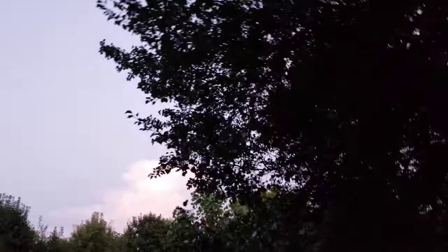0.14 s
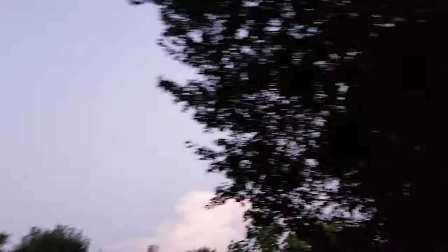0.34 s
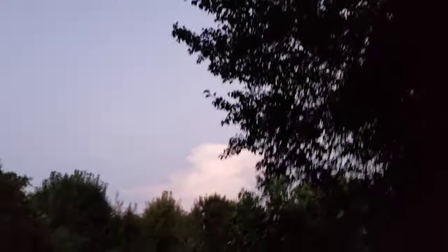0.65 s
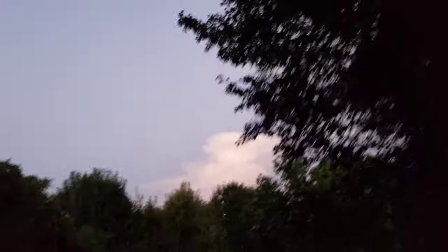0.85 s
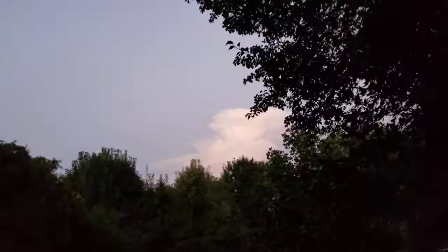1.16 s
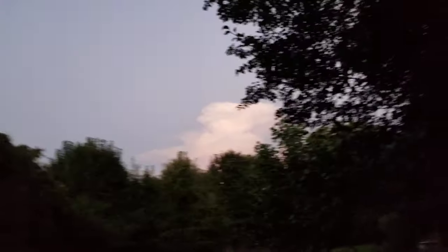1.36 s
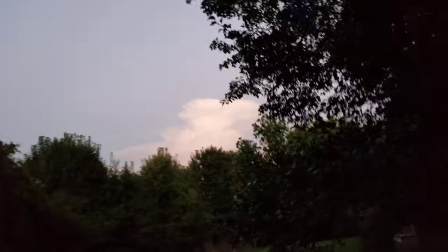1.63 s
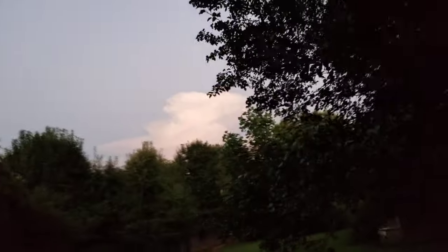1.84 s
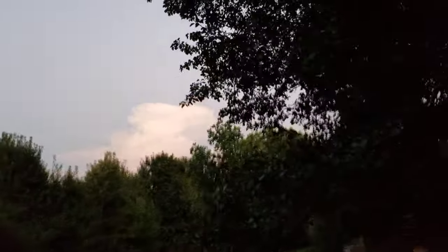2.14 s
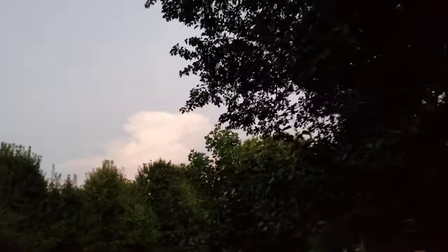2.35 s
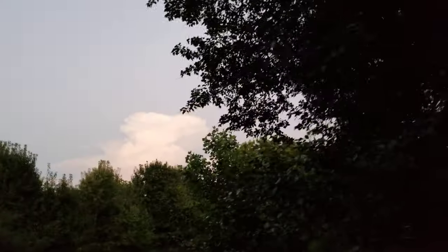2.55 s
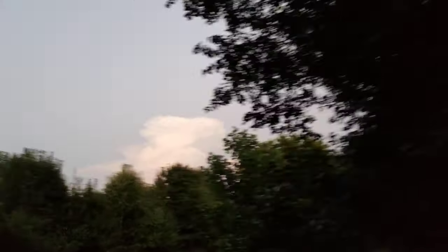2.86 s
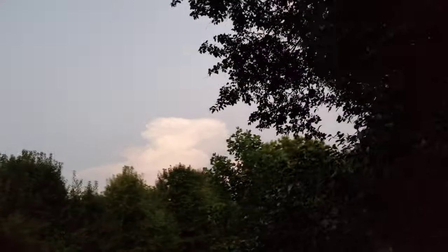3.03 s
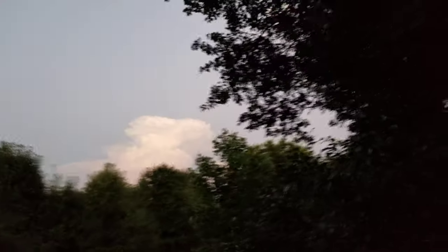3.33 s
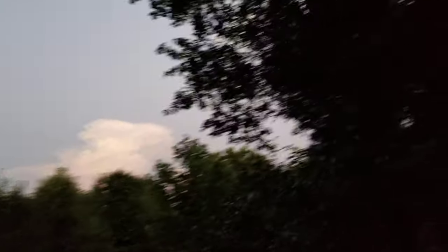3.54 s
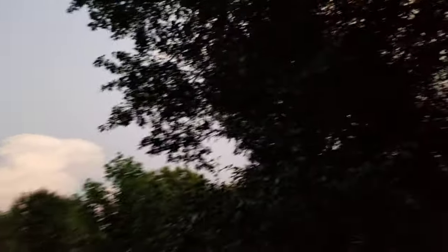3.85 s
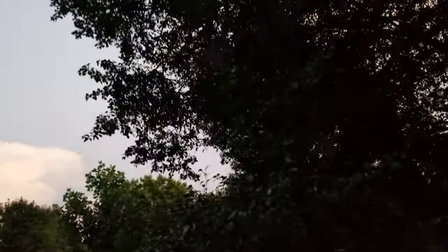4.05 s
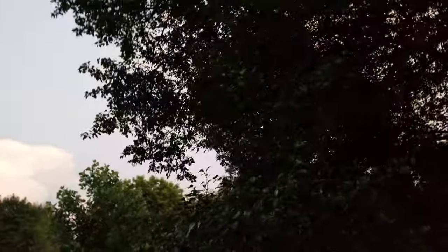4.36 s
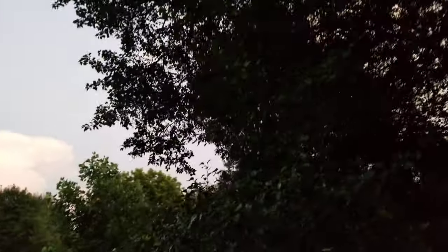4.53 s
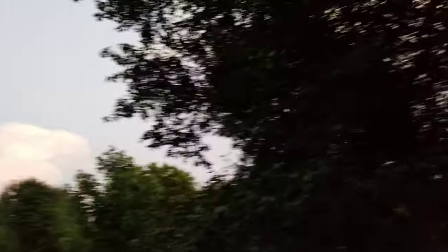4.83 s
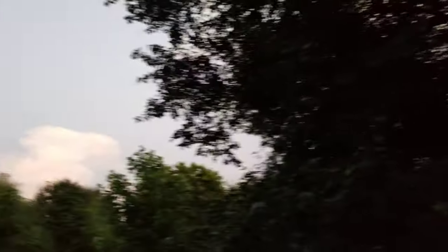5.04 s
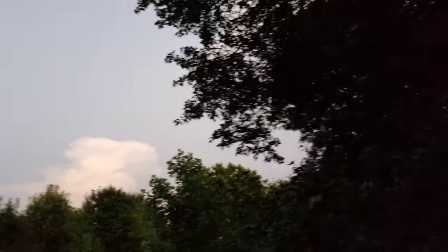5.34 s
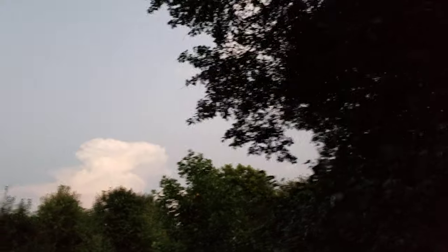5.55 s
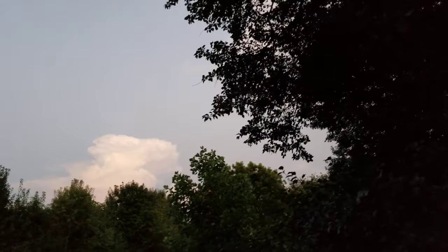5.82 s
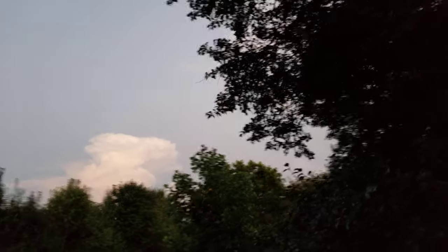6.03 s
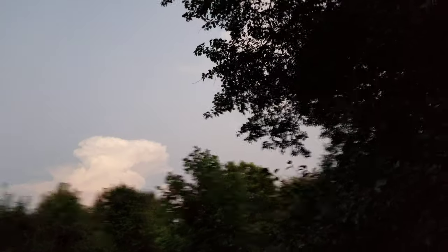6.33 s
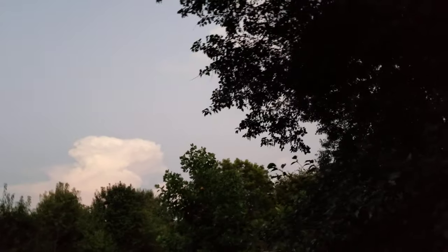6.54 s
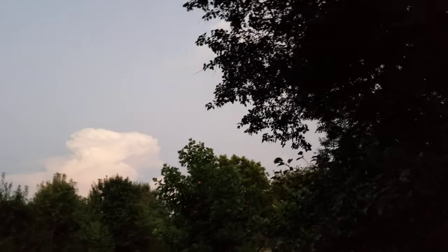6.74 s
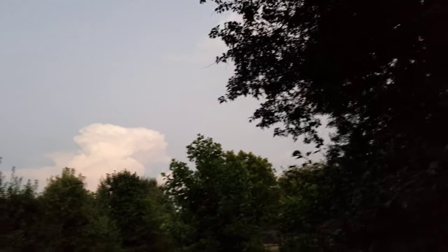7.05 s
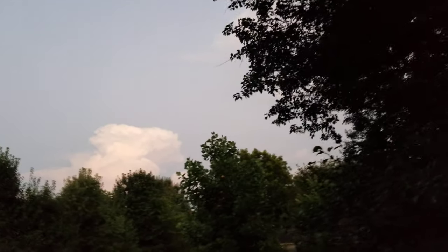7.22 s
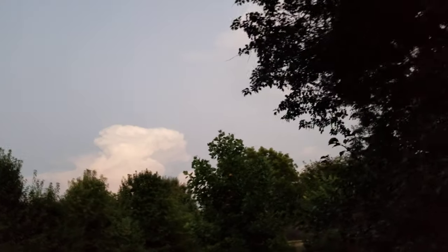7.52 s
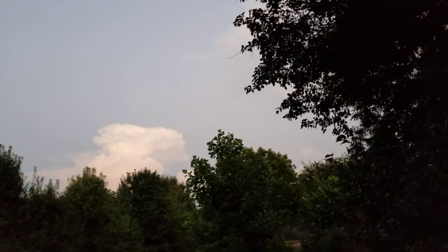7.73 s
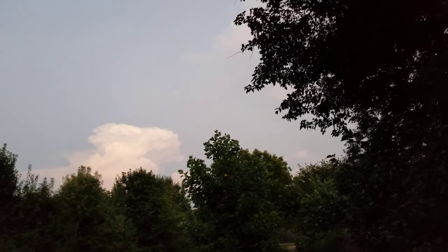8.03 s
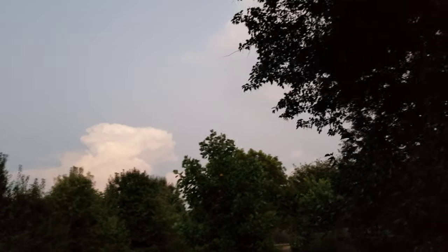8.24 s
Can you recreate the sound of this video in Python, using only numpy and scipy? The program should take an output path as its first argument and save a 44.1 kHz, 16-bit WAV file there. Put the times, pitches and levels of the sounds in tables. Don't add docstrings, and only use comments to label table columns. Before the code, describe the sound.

Under trees at dusk, a small handheld stereo microphone hears a single nearby cicada rattling dry rapid clicks with a hollow ring. Its buzz slows slightly, then accelerates and swells strongly, still notched by brief gaps three or so times a second. Far insects pulse on a high shrill band, gradually losing their step. Beneath lie a humming air conditioner, whose pump swells in early, and soft distant traffic.

```python
import sys
import numpy as np
from scipy import signal
from scipy.fft import rfft, irfft
from scipy.io import wavfile
from scipy.ndimage import uniform_filter1d, map_coordinates

SR = 44100
rng = np.random.default_rng(int(sys.argv[2]) if len(sys.argv) > 2 else 0)


def level_to_linear(level):
    exponent = np.asarray(level, float) / 20
    return 10 ** exponent


def int16_out(signal):
    q = np.round(np.clip(np.atleast_2d(signal).T, -1, 1) * 32767)
    wavfile.write(sys.argv[1], SR, q.astype(np.int16))


N = 369558
T = np.arange(N) / SR
HZ = np.fft.rfftfreq(N, 1 / SR)


def evened(x):
    return x / np.sqrt(np.mean(x ** 2) + 1e-20)


def columns(rows):
    s, *values = np.transpose(rows)
    return [np.interp(T, s, v) for v in values]


def read(points, hz):
    f, value = np.transpose(points)
    return np.interp(np.log(hz + 1), np.log(f + 1), value)


def coloured(x, gain):
    y = irfft(rfft(x) * gain, N)
    middle = np.atleast_2d(y).mean(0)
    return y / np.sqrt(np.mean(middle ** 2))


def above(edge_hz, soft_hz):
    return 1 / (1 + np.exp(np.clip((edge_hz - HZ) / soft_hz, -50, 50)))


def panned(db):
    return level_to_linear(np.array([[.5], [-.5]]) * db)


def wander(top_hz):
    return evened(irfft(rfft(rng.standard_normal(N)) / (1 + (HZ / top_hz) ** 2), N))


def patchy_noise(points, same, patchy_db):
    a, b, c, d, patches = rng.standard_normal((N // 256 + 5, 513, 5)).T
    patches = uniform_filter1d(patches, size=8, axis=0)
    patches = evened(uniform_filter1d(patches, size=12, axis=1))
    same = np.clip(same * np.ones(513), -1, 1)[:, None]
    left = a + 1j * b
    right = same * left + np.sqrt(1 - same ** 2) * (c + 1j * d)
    z = np.array([left, right]) * level_to_linear(patchy_db * patches)
    noise = signal.istft(z, nperseg=1024, noverlap=768)[1][:, :N]
    return coloured(noise, level_to_linear(read(points, HZ)))


def leaves(direct, envelope, lag, rustle_db, rustle_s, echo_db, t60):
    left = map_coordinates(direct, [np.arange(N) - lag], order=3, mode="nearest")
    keep = np.exp(-1 / (rustle_s * SR))
    smeared = np.sqrt(signal.lfilter([1 - keep], [1, -keep], envelope ** 2))
    out = np.array([left, direct]) + level_to_linear(rustle_db) * smeared * rng.standard_normal((2, N))
    t = np.arange(8000) / SR
    for k in range(3):
        share = np.sqrt(2 / 3) * np.cos(2 * np.pi * (.3 * T + k / 3))
        tail = rng.standard_normal((2, len(t))) * level_to_linear(-60 * t / t60) * (t > .002)
        tail /= np.linalg.norm(tail, axis=1, keepdims=True)
        out += level_to_linear(echo_db) * signal.oaconvolve((direct * share)[None], tail, axes=1)[:, :N]
    return out


PAUSE_STARTS = [1.69, 2.066, 2.432, 2.761, 3.074, 3.371, 3.667, 3.952, 4.228, 4.507, 4.784, 5.08, 5.384,
                5.728, 6.111, 6.506, 6.892, 7.248, 7.592, 7.922, 8.264]


def phrase_gaps(rate):
    depth_db = np.interp(T, [PAUSE_STARTS[0], PAUSE_STARTS[0] + 1.2], [6, 17])
    depth_db -= 9 * np.clip((rate - 216) / 20, 0, 1)
    early_s, half_length_s = .002, .0098
    gap_shape, stutter_db = 0, 0
    for s in PAUSE_STARTS:
        gap_shape += np.exp(-((T - s + early_s) / half_length_s) ** 4)
        stutter_db += 3.5 * np.exp(-((T - s - .018) / .009) ** 2)
        stutter_db -= 15 * np.exp(-((T - s - 6.5 / rate) / .005) ** 2)
    slow = np.clip((226 - rate) / 20, 0, 1)
    return slow * stutter_db - depth_db * gap_shape


CLICK_DB = [-12, -8, -8.5, -4]


def buckling_ribs(rate, lag):
    unsteady = 1 + .005 * wander(6) + .012 * wander(150)
    turns = np.cumsum(rate * unsteady) / SR
    click = turns.astype(int)
    chance_db = 1.5 * rng.standard_normal(click[-1] + 1)
    size = level_to_linear(np.array(CLICK_DB)[click % len(CLICK_DB)] + chance_db[click])
    gaps_db = phrase_gaps(rate)
    puff = np.sin(np.pi * (turns % 1))
    tick = size * np.diff(np.floor(turns - .5), prepend=-1)
    soft = level_to_linear(0.66 * gaps_db) * (5.5 + size * puff ** 5.7)
    sharp = level_to_linear(0.55 * np.minimum(gaps_db, 0)) * (0.43 + size * puff ** 3.7)
    soft_crackle = soft * (rng.standard_normal(N) + 11 * tick)
    sharp_crackle = sharp * (rng.standard_normal(N) + 2.2 * tick)
    soft_pair = leaves(soft_crackle, soft, lag, -3, .002, -3, .1)
    sharp_pair = leaves(sharp_crackle, sharp, lag, 0.53, 0.00097, -0.36, 0.037)
    return soft_pair, sharp_pair


# pitch_hz, level_db
SLOW_BELLY = [(880, -51), (1500, -21.5), (1950, -11), (2450, 0), (3120, -1), (3780, -13.5), (5230, -18.5),
              (6040, -28), (6300, -28), (8190, -72), (13900, -120)]
# pitch_hz, level_db
RISING_BELLY = [(880, -34), (1500, -21.5), (1970, -16), (2150, -8.5), (2370, -6), (2960, -1.5),
                (3540, -2.5), (3870, -17), (4340, -17), (5200, -20.5), (5760, -27), (6110, -19),
                (6300, -24), (8190, -47), (13900, -120)]
# pitch_hz, level_db
FAST_BELLY = [(880, -33), (1500, -22.5), (1720, -22.5), (2050, -12.5), (2500, -9.5), (2970, -1),
              (3330, -7.5), (3760, -7), (4110, -11.5), (4670, -17), (5260, -18.5), (5590, -23.5),
              (6300, -23), (8190, -53), (13900, -120)]
# pitch_hz, width_hz, level_db
BELLY_TONES = [(2090, 92, 4.5), (2317, 24, 5), (2660, 150, 3), (2946, 71, 9.5), (3214, 57, 6),
               (3570, 98, 6), (3740, 62, 7.5), (5126, 190, 8)]
# pitch_hz, left_over_right_db
CASING_SHADE = [(1500, -7), (2000, -5), (2500, 2), (3000, 2.5), (3700, -1.3), (5000, -1.5), (6300, -1.5)]


def belly_ring(soft, rate):
    tones_db = sum(db / (1 + (2 * (HZ - hz) / width) ** 2) for hz, width, db in BELLY_TONES)
    slack = np.clip((192 - rate) / 14, 0, 1)
    tight = np.clip((rate - 208) / 24, 0, 1)
    shade = panned(read(CASING_SHADE, HZ))
    belly = slack * coloured(soft, shade * level_to_linear(read(SLOW_BELLY, HZ)))
    belly += (1 - slack - tight) * coloured(soft, shade * level_to_linear(read(RISING_BELLY, HZ) + 0.81 * tones_db))
    belly += tight * coloured(soft, shade * level_to_linear(read(FAST_BELLY, HZ) + tones_db))
    return belly


def two_bands(x, split, low_db, top_db):
    return level_to_linear(low_db) * coloured(x, 1 - split) + level_to_linear(top_db) * coloured(x, split)


# start_s, clicks_per_s, left_delay_samples
CLICK_SPEED = [
    (1, 175, -15.5),
    (2.9, 163, -12),
    (3.5, 190, -1),
    (4.1, 202, -3.5),
    (4.9, 216, 3),
    (5.5, 243, 3),
    (8.4, 234, 5),
]
# start_s, level_db, stiffness_0_to_1
BUZZ_LEVEL = [(.55, -57.5, 0), (1, -54.5, 0.1), (1.57, -49, 0.34), (2.7, -46, 0.33), (3.6, -41, 0.28),
              (4.5, -36, 0.13), (5.1, -34.5, 0.33), (6.2, -34.5, 0.36), (6.9, -34, 0.42),
              (7.4, -35.5, 0.57), (8.38, -35.5, 0.66)]
# pitch_hz, level_db
SNAP_COLOUR = [(7900, -52), (8500, -5.5), (8850, -9), (9410, 1), (10100, 2), (12200, -2), (14100, -3),
               (15100, -5), (16000, -7)]


def cicada():
    rate, lag = columns(CLICK_SPEED)
    soft, sharp = buckling_ribs(rate, lag)
    belly = belly_ring(soft, rate)
    snap = coloured(sharp, level_to_linear(read(SNAP_COLOUR, HZ)))
    loud_db, stiff = columns(BUZZ_LEVEL)
    belly = two_bands(belly, above(3684, 90), loud_db, loud_db - 14.5 + 8 * stiff)
    snap = two_bands(snap, above(12330, 610), loud_db - 16 + 7 * stiff, loud_db - 20.5 + 15.5 * stiff)
    snap_pan_db = -1.5 - 0.15 * lag
    return panned(-5) * belly + panned(snap_pan_db) * snap


# pitch_hz, level_db
CHORUS_COLOUR = [(3530, -47), (6000, -22.5), (6120, -23), (6500, -5.5), (6920, 5.5), (7330, -3),
                 (7590, -21.5), (8000, -18), (10400, -77), (17600, -120)]
# start_s, crest_over_dip_db
TOGETHER = [
    (.7, 8.5),
    (2.3, 9.5),
    (5, 9),
    (6.2, 5),
    (7.2, 2.5),
    (8.38, 2),
]


def chorus():
    throbs_per_s, crest_s = 4.1406, .7169
    up = (.5 + .5 * np.cos(2 * np.pi * throbs_per_s * (T - crest_s))) ** 0.6
    level_db = -41.5 + columns(TOGETHER)[0] * (up - 1 + 0.41)
    octave = [(2 * hz, 1.05 * db) for hz, db in CHORUS_COLOUR]
    rasp = level_to_linear(0.62 * np.array([wander(60), wander(69)]))
    song = panned(-7.5) * patchy_noise(CHORUS_COLOUR, 0.026, 0.92) * rasp
    song += level_to_linear(-18.5) * panned(-1.2) * patchy_noise(octave, .08, 0.99)
    return level_to_linear(level_db - 2.5 + .5 * wander(2.3)) * song


# pitch_hz, level_db
HAZE_COLOUR = [(1500, -28), (2600, -4), (4000, -9), (5800, -11.5), (8000, -11.5), (9500, -7), (12500, -21),
               (14500, -32), (17000, -40)]


def insect_haze():
    rise_db = np.interp(T, [.55, 2.5], [-4, 0])
    return level_to_linear(-53.5 + rise_db) * patchy_noise(HAZE_COLOUR, 0.09, 1.1)


# multiple_of_turning_speed, level_db
FAN_HUM = [(1, -70), (3, -47.5), (5, -56), (7, -58.5), (9, -55.5), (15, -76)]
# multiple_of_turning_speed, level_db
PUMP_HUM = [(10, -66), (13, -82.5), (14, -79), (15, -71.5), (16, -79), (17, -82), (18, -72), (19, -68),
            (20, -65.5), (21, -57.5), (22, -74), (23, -66), (31, -67)]
# start_s, level_db
PUMP_LEVEL = [
    (1, -65),
    (2, -11),
    (3.5, -3.5),
    (4, 1),
    (6.2, 1),
    (7, -2.5),
    (8.4, 0.5),
]


def air_conditioner():
    fan_hz, pump_hz = 27.84, 58.84
    out = np.zeros(N)
    spin = 2 * np.pi * np.cumsum(fan_hz * (1 + 0.01202 * wander(1.58))) / SR
    for order, db in FAN_HUM:
        tone = np.sqrt(2) * np.cos(order * spin + 2 * np.pi * rng.random())
        out += level_to_linear(db + 2.3 * wander(3.5)) * tone
    swell_db = columns(PUMP_LEVEL)[0]
    for order, db in PUMP_HUM:
        tone = np.sqrt(2) * np.cos(2 * np.pi * (order * pump_hz * T + rng.random()))
        out += level_to_linear(db + swell_db + .8 * wander(1.4)) * tone
    return out


# pitch_hz, level_db
WASH_COLOUR = [(12, -50), (20, -27), (49, -9), (64, -8.5), (80, -5), (107, -4.5), (191, -3.5), (436, -6.5),
               (763, -15.5), (1120, -18.5), (1210, -19.5), (1680, -24), (2000, -21.5), (2600, -25),
               (4400, -120)]
# pitch_hz, likeness_0_to_1
LIKENESS = [(30, 0.93), (90, 0.98), (180, 0.98), (350, 0.98), (700, 0.86), (1200, 0.37), (1700, 0.15),
            (2500, 0.19)]
# start_s, level_db
TRAFFIC_LEVEL = [
    (.55, -3.5),
    (1.4, -2.5),
    (2.4, -1),
    (4.4, 0),
    (7.3, 0),
    (8.38, -0.5),
]


def traffic_wash():
    near_db = columns(TRAFFIC_LEVEL)[0]
    same = read(LIKENESS, np.fft.rfftfreq(1024, 1 / SR))
    x = patchy_noise([(10, 0), (20000, 0)], same, 1.2)
    x[0] = np.roll(x[0], -4)
    colour, split = level_to_linear(read(WASH_COLOUR, HZ)), above(466, 110)
    rumble = level_to_linear(-42.5 + near_db) * coloured(x, colour * (1 - split))
    rush = level_to_linear(-50.4 + 2.8 * near_db) * panned(-2.5) * coloured(x, colour * split)
    return rumble + rush


def scene():
    return cicada() + chorus() + insect_haze() + air_conditioner() + traffic_wash()


def masked(x, under_db, spread_db, peak_db, top_db, bin_db):
    hz, _, z = signal.stft(x, SR, nperseg=2048, noverlap=1024)
    power = abs(z[:, :1024]) ** 2
    power_db = 10 * np.log10(power + 1e-20)
    level_db = 10 * np.log10(power.reshape(2, 64, 16, -1).mean(2) + 1e-20)
    loud_db = level_db.max(0)
    hidden = [np.roll(loud_db, k, axis=0) - under_db - spread_db * abs(k) for k in range(-3, 7)]
    mask_db = np.max(hidden, axis=0)
    centre_hz = hz[8:1024:16, None]
    mask_db = np.maximum(mask_db, loud_db[4:16].max(0) - peak_db)
    mask_db = np.where(centre_hz > 14500, np.maximum(mask_db, top_db), mask_db)
    mask_db += 2.2 * uniform_filter1d(rng.standard_normal(mask_db.shape[1]), size=3)
    mask_db += 1.3 * rng.standard_normal(mask_db.shape)
    mask_db = np.where(centre_hz < 3000, -200, mask_db)
    band_kept = np.repeat(level_db > mask_db, 16, axis=1)
    z[:, :1024] *= band_kept & (power_db > np.repeat(mask_db, 16, axis=0) + bin_db)
    return signal.istft(z, SR, nperseg=2048, noverlap=1024)[1][:, :N]


def low_pass(x):
    return signal.sosfilt(signal.butter(12, 16880, fs=SR, output="sos"), x)


def record(dry):
    start_s, full_db, fade_db, fade_s = .528, -3, -27.5, 0.15
    started = T > start_s
    fade = fade_db * np.exp(-np.maximum(T - start_s, 0) / fade_s)
    faded = dry * level_to_linear(full_db + fade) * started
    thinned = masked(faded, 22.5, 1.5, 29, -90, 1) * started
    edge = signal.firwin(511, 15850, window=("kaiser", 9), fs=SR)
    mix = signal.oaconvolve(thinned, edge[None], "same")
    return low_pass(mix)


dry = scene()
out = record(dry)
int16_out(out)
```